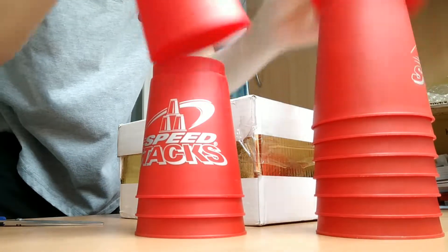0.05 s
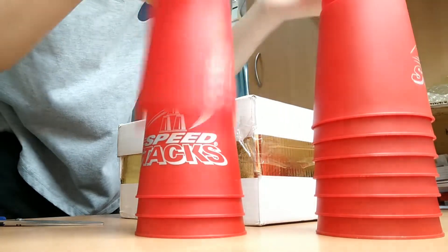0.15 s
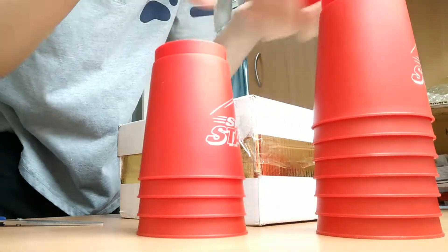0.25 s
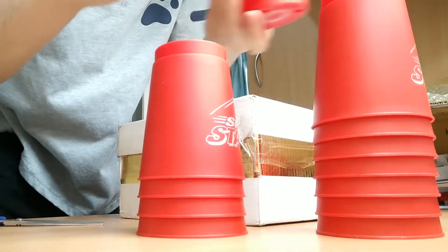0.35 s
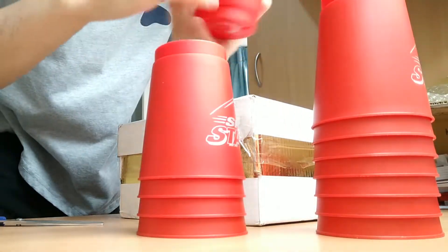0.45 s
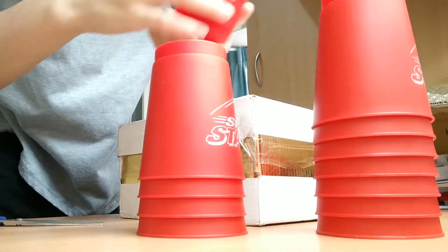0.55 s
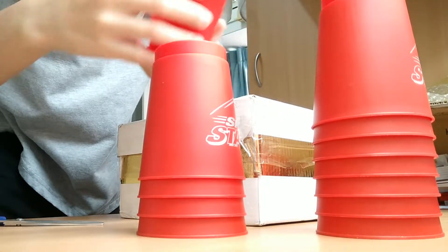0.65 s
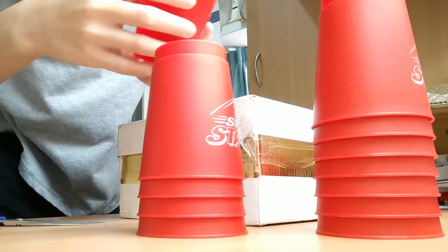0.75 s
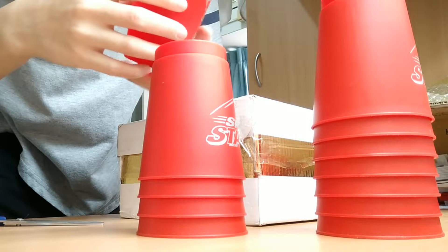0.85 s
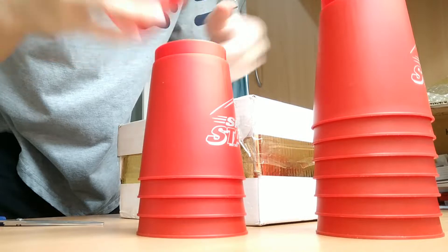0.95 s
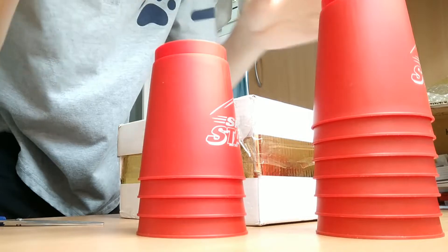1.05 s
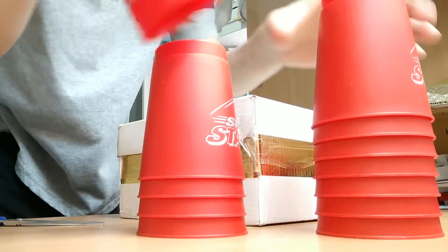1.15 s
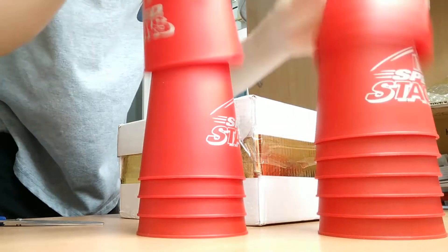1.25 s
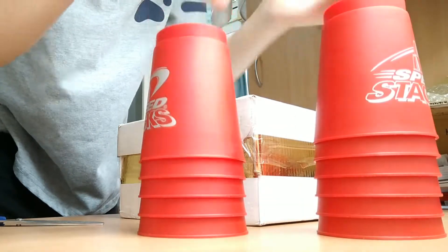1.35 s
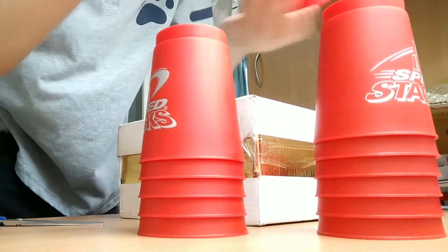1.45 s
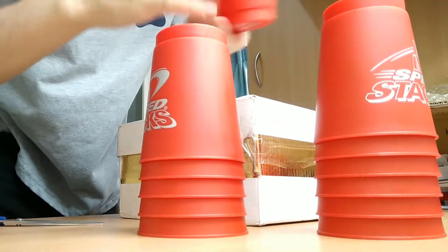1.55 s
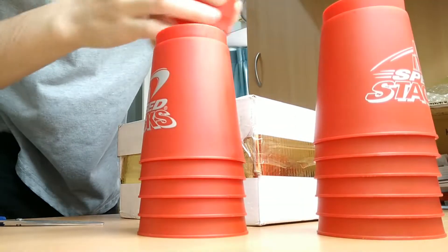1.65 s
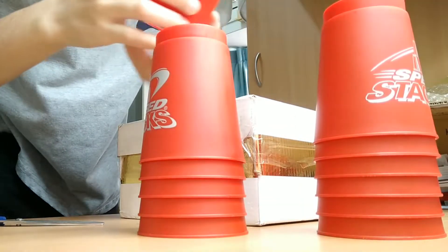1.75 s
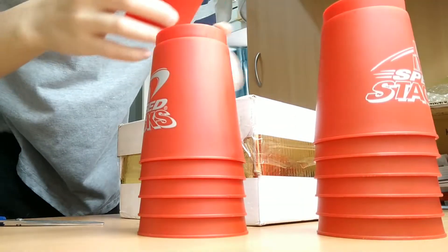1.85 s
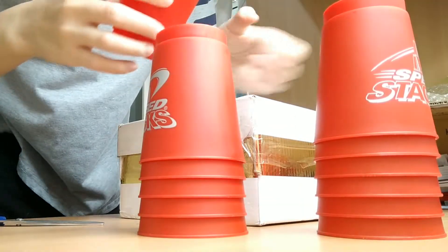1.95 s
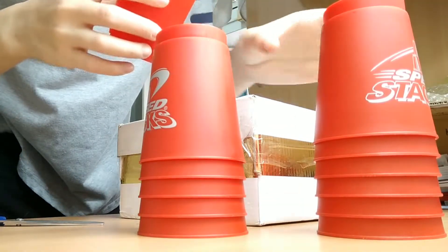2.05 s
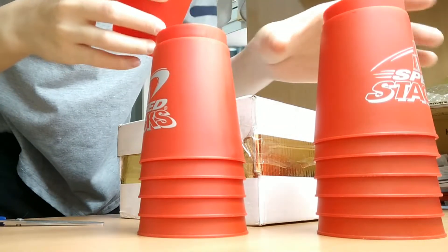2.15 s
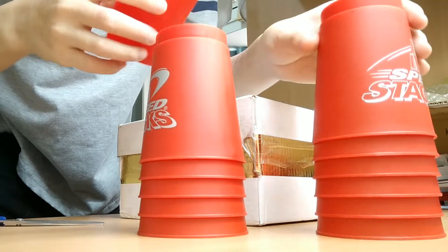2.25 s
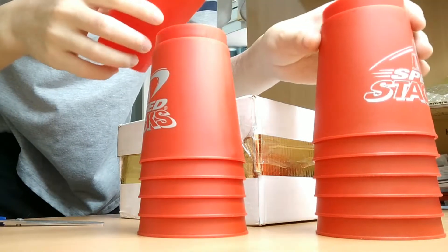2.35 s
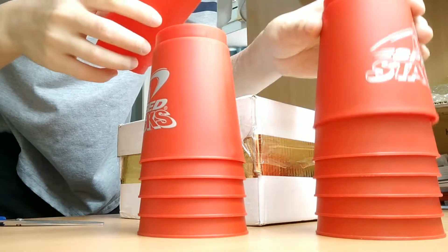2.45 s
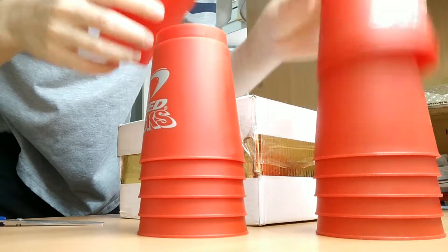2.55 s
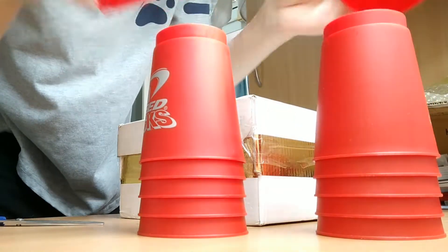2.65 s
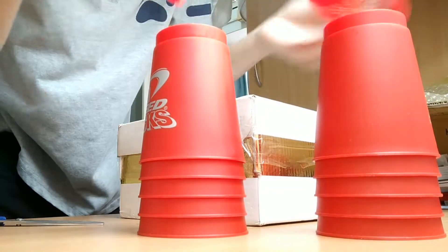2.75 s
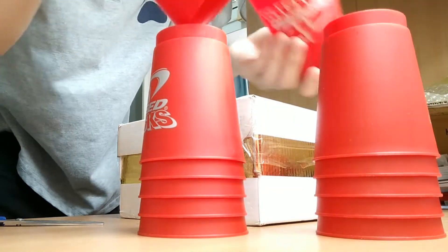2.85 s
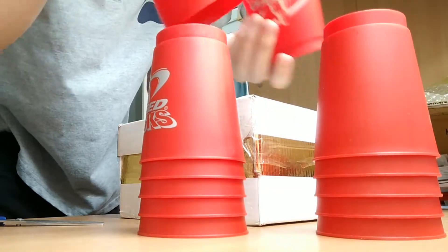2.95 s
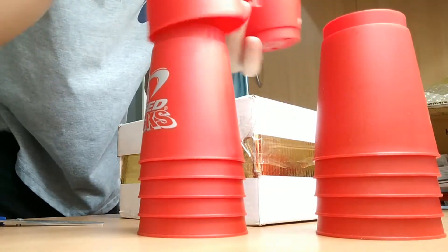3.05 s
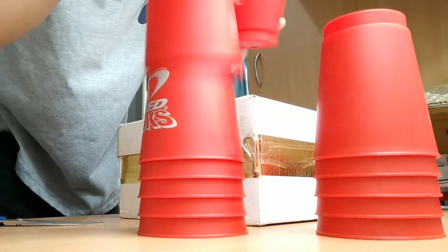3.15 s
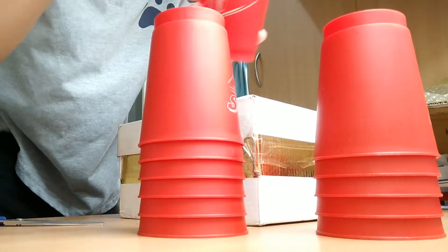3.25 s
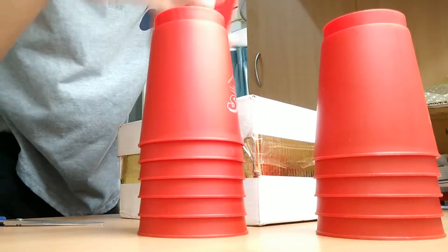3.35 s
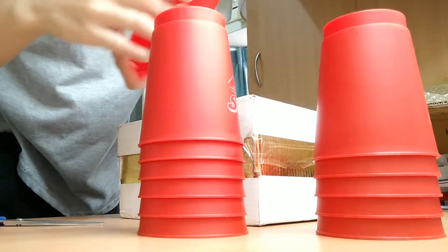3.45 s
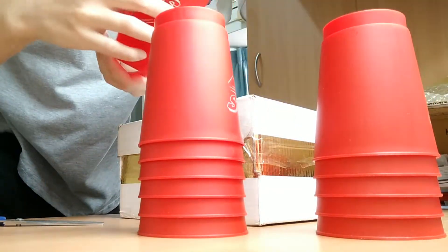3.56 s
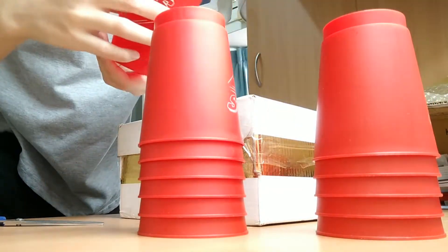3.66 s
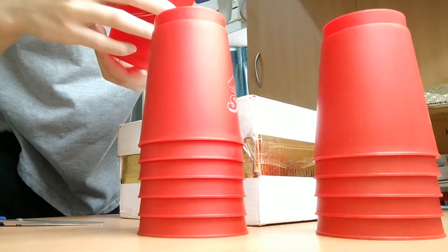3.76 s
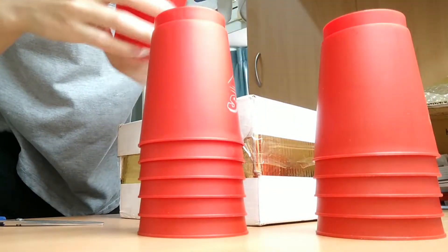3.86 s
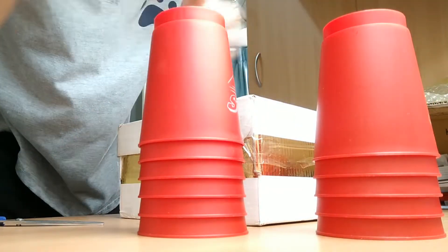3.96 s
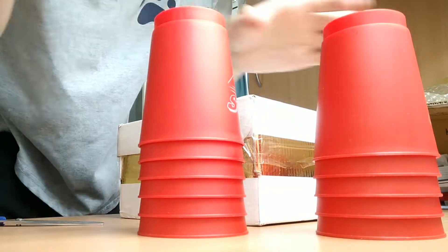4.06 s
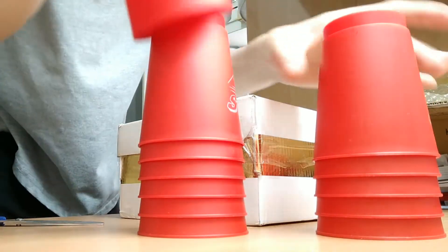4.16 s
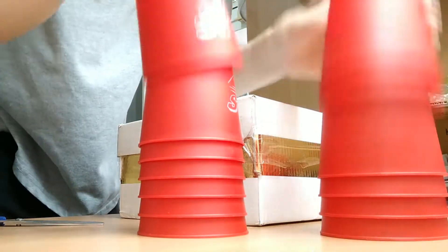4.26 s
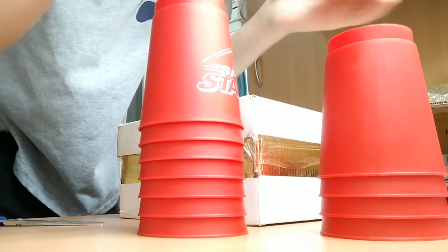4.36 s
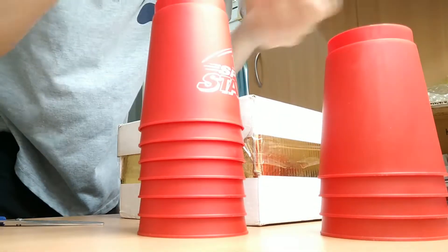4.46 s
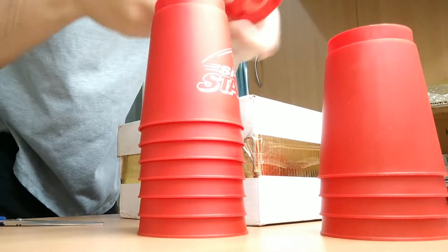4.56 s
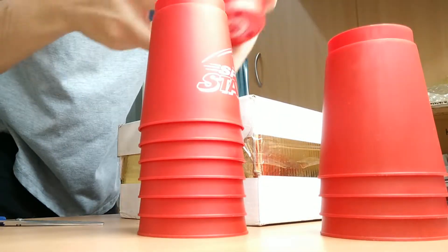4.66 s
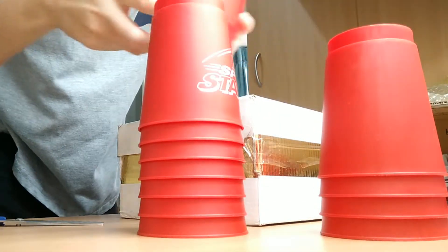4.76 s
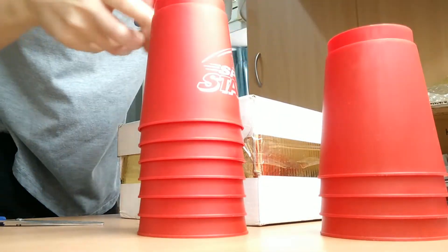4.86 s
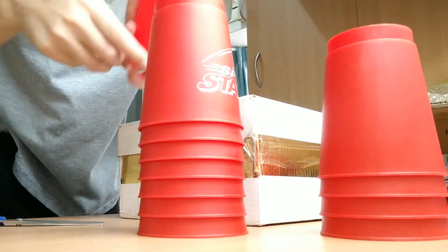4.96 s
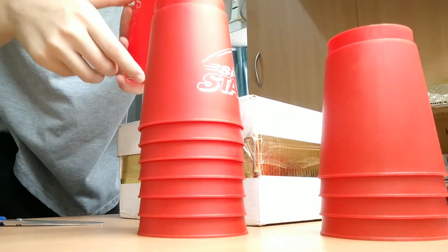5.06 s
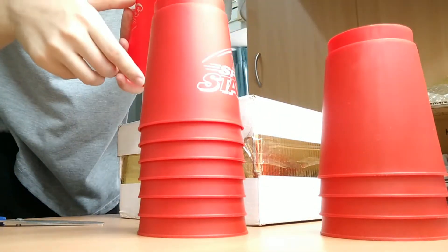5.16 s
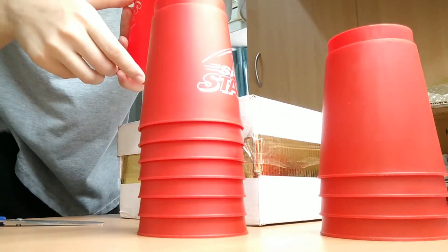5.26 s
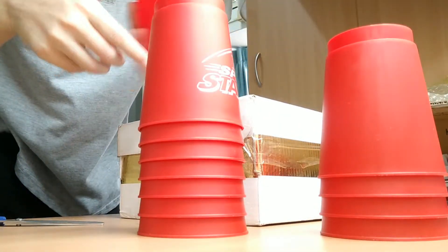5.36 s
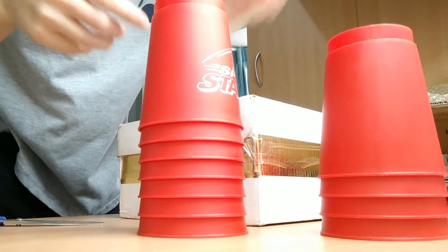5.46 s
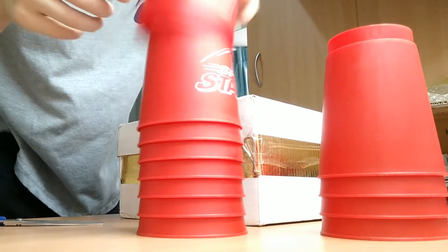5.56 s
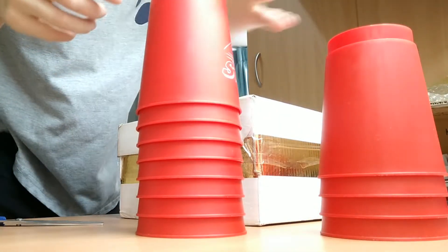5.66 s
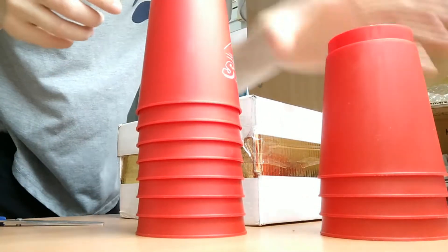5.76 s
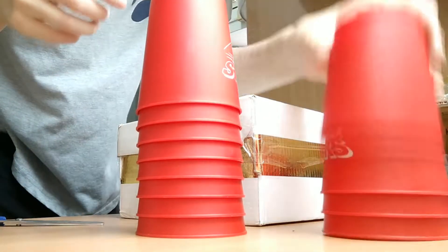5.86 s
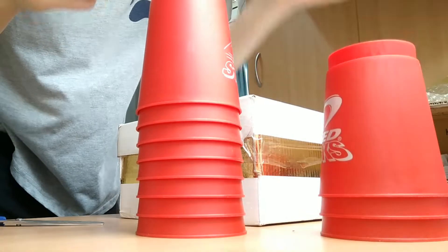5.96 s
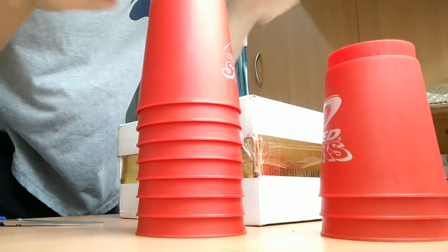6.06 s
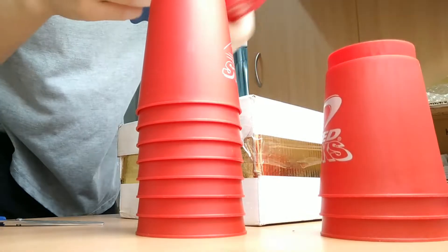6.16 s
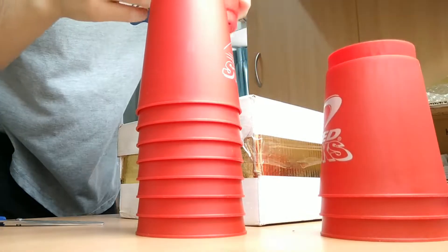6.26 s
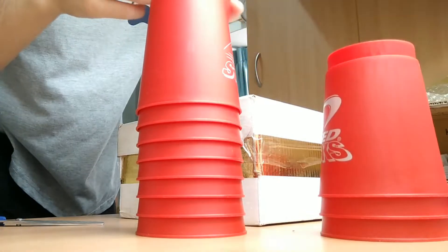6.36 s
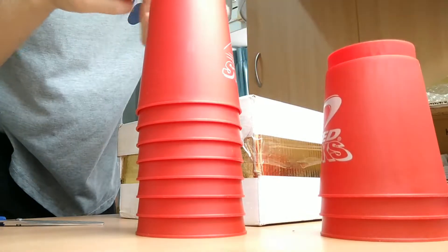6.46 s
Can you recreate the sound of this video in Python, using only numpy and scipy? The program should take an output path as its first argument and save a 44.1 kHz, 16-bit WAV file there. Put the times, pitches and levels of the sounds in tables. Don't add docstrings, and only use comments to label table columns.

```python
import sys
import numpy as np
from scipy import signal
from scipy.fft import rfft, irfft, next_fast_len
from scipy.io import wavfile
from scipy.ndimage import uniform_filter1d

SR = 44100
rng = np.random.default_rng(int(sys.argv[2]) if len(sys.argv) > 2 else 0)


def bounce(signal):
    frames = np.transpose(np.atleast_2d(signal))
    limited = np.clip(frames, -1, 1)
    pcm = np.round(limited * 32767).astype(np.int16)
    wavfile.write(sys.argv[1], SR, pcm)


def magnitude_from_level(level_db):
    exponent = np.asarray(level_db, float) / 20
    return 10 ** exponent


N = 287091

# start in seconds, peak in dB, cup pitch in Hz, rim click in dB against the peak.
STACK_KNOCKS = [(0.2803, -20.5, 1122, -5.5), (1.298, -49.5, 973.5, -29), (1.315, -31, 1009, -25.5),
                (1.361, -29.5, 1006, -8), (1.423, -25, 1026, -16), (2.384, -41, 1057, -14),
                (2.705, -35.5, 1220, 1), (3.242, -26.5, 1170, -11.5), (4.319, -50.5, 1335, -13.5),
                (4.3503, -19, 1104, -7.5), (4.4181, -20.5, 1002, -5.5), (4.424, -22, 1024, -0.5),
                (4.442, -17.5, 1000, -19.5), (5.703, -17.5, 1060, -28.5), (5.7331, -18, 1275, -4.5),
                (5.744, -16.5, 968, -14.5)]
# the same four, then trapped air in dB against the peak.
LANDINGS = [(1.37, -14.5, 1150, -6.5, -15), (1.4391, -9, 1190, -4.5, -9), (1.4601, -5.5, 1170, -10, -11),
            (2.934, -13.5, 1184, -13, -7.5), (3.302, -14.5, 1113, -6.5, -11),
            (3.326, -3.5, 1117, -13, -11.5), (4.377, -19.5, 1068, -5.5, -8),
            (4.387, -11.5, 1070, -6, -14.5), (4.459, -13.5, 1000, -18.5, -16.5),
            (5.6656, -9, 1094, -8.5, -13), (5.674, -4.5, 1119, -18, -31.5), (5.686, -12, 1181, -1.5, -26),
            (6.0022, -11, 1181, -31, -13.5), (6.007, -15, 1200, -42, -23.5), (6.013, -13, 1184, -30, -19.5)]
# factor on the cup pitch, level in dB, seconds to fade by 60 dB.
WALL = [(0.749, -9.5, 0.02), (.87, -6, 0.025), (1.002, 0.5, 0.03), (1.13, -6.5, 0.012), (1.29, -5, 0.022),
        (1.498, -3, 0.018), (1.75, -19, .014), (2.1, -13, .012)]


def stack_knocks():
    glancing = [(*row, -10.5 - 0.024 * (row[1] + 15)) for row in STACK_KNOCKS]
    return knocks(glancing + LANDINGS, 3160, WALL)


# start in seconds, peak in dB, cup pitch in Hz,
# rim click in dB against the peak, trapped air in dB against the peak.
LOOSE_KNOCKS = [(0.193, -11.5, 1449, -15, -10.5), (0.244, -44.5, 1447, -0.5, -26.5),
                (0.302, -13.5, 1479, -7.5, -11), (0.307, -27, 1510, -25, -24),
                (0.3195, -6.5, 1521, -21.5, -13), (0.859, -53, 1530, -6.5, -28.5),
                (2.943, -23.5, 1528, -4.5, -16), (2.952, -24.5, 1530, -4.5, -26),
                (3.012, -35, 1580, -4, -10), (3.064, -39, 1460, -9.5, -35), (3.126, -8.5, 1446, -38, -26),
                (3.168, -23.5, 1481, -12, -17), (3.2345, -30.5, 1760, -10, -32),
                (3.538, -66.5, 1530, 2, -23.5), (4.169, -66.5, 1640, -17.5, -28),
                (4.363, -20.5, 1573, -25.5, -9), (4.822, -42.5, 1215, -16, -39),
                (5.7545, -13.5, 1524, -17, -8.5), (5.954, -39.5, 1575, -7, -2),
                (5.974, -28.5, 1557, -13, -2), (6.034, -30.5, 1460, 3, 2.5)]
# factor on the cup pitch, level in dB, seconds to fade by 60 dB.
HELD_WALL = [(0.749, -10.5, 0.023), (0.871, -2, .018), (0.999, -0.6, 0.035), (1.131, -5, 0.029),
             (1.29, -11, 0.029), (1.5, -18, 0.014), (1.751, -15, 0.01), (2.1, -15, 0.0083)]


def loose_knocks():
    return knocks(LOOSE_KNOCKS, 2710, HELD_WALL)


# pitch in Hz, level in dB, seconds to fade by 60 dB.
CAVITY = [(375, -8.5, 0.017), (526, -1, 0.012), (543.2, -2, 0.051), (750, -6, 0.014), (869.2, -8.5, 0.0086)]


def knocks(rows, spot_hz, wall):
    out, t = np.zeros((2, N)), np.arange(SR // 12) / SR
    for (s, db, hz, click_db, cavity_db), luck in zip(rows, rng.standard_normal((len(rows), 6040))):
        rim_hz = spot_hz * np.exp(0.081 * luck[-1])
        contact_s = 0.0021 * (1.1 + max(-38.0 - db, 0) / 4.1)
        held = magnitude_from_level(60 * np.minimum(t, contact_s) / 0.043)
        swell = np.sin(np.pi / 2 * np.minimum(t / contact_s, 1)) ** 2 * held
        uneven = 1 + 0.3 * np.resize(evened(uniform_filter1d(luck[40:2040], 40)), len(t))
        wall_ring = ring(wall, luck, hz, spread_db=2, detune=0.015, size=len(t))
        air_ring = ring(CAVITY, luck[20:], detune=0.05, size=len(t))
        sound = peaked(swell * uneven * wall_ring, db)
        sound += peaked(swell * uneven * air_ring, db + cavity_db + 5.5)
        u = t[:2000] / (contact_s + 0.0016)
        puff = np.sin(np.pi / 2 * np.minimum(u * 3, 1)) ** 2 * np.exp(-u * 0.46)
        tilt_db = 1.6 * (click_db + 13.0)
        rims = [puff * rim(v, tilt_db, rim_hz) for v in luck[2040:].reshape(2, -1)]
        add(sound, 0, peaked(rims[0], db + click_db + 0.43))
        add(out[0], s - 0.0006, sound)
        add(out[1], s - 0.0006, peaked(rims[1], db + click_db - 2.5))
    return out


# frequency in Hz, level in dB per Hz.
CLICK = [(400, -49.5), (1500, -27), (2300, 8.5), (3250, 1), (4900, 0), (6900, -10.5), (7900, -17),
         (16000, -50.5)]


def rim(luck, tilt_db, peak_hz):
    hz = np.fft.rfftfreq(len(luck), 1 / SR)
    spot = 1 + magnitude_from_level(10.5) / (1 + ((hz - peak_hz) / 200) ** 2)
    colour_db = read(CLICK, hz) + tilt_db * np.log2(np.maximum(hz / 3000, 1))
    return irfft(rfft(luck) * spot * magnitude_from_level(colour_db))


# start in seconds, peak in dB, pitch of the low group in Hz, pitch of the high group in Hz.
TICKS = [(0.1938, -15.5, 3330, 5047), (0.2431, -32.5, 3150, 4756), (0.2801, -17.5, 3200, 4414),
         (0.3041, -16.5, 3100, 4386), (0.3174, -21.5, 2530, 5370), (1.3102, -47, 3090, 6350),
         (1.3375, -38.5, 3750, 6273), (1.3603, -23.5, 3930, 4296), (1.3686, -17.5, 3340, 4607),
         (1.4398, -8, 3400, 4127), (1.4587, -12.5, 2370, 6030), (2.7055, -25.5, 3770, 5360),
         (3.01, -25.5, 2386, 4100), (3.243, -28, 3300, 4973), (3.3006, -12.5, 3340, 4740),
         (3.3264, -15, 2675, 4933), (4.349, -20.5, 2800, 5100), (4.3764, -22, 2680, 4420),
         (4.3863, -10.5, 2570, 4426), (4.418, -23, 3160, 4590), (4.4232, -16, 3310, 4220),
         (4.4375, -24.5, 3900, 4000), (4.4602, -23, 2510, 4960), (5.6653, -12.5, 2750, 5390),
         (5.6747, -10, 3160, 5580), (5.6853, -19, 3370, 4952), (5.7218, -26, 3380, 5060),
         (5.733, -16.5, 3310, 4537), (5.7433, -21, 2700, 5130), (5.7537, -17.5, 2600, 5000),
         (5.9455, -46, 3700, 6390), (5.9544, -44, 3370, 4030), (5.9738, -31.5, 3630, 6160),
         (5.9915, -32.5, 2830, 4300), (6.0154, -23.5, 2310, 5170), (6.0344, -20.5, 3120, 4720)]
# factor on the group pitch, level in dB, seconds to fade by 60 dB.
TICK = [(.95, -3, 0.0075), (1.001, 2.5, 0.02), (1.06, -8, .012)]


def ticks():
    out, t = np.zeros((2, N)), np.arange(1500) / SR
    swell = np.sin(np.pi / 2 * np.minimum(t / 0.00092, 1)) ** 2
    for (s, db, low_hz, high_hz), luck in zip(TICKS, rng.standard_normal((len(TICKS), 24))):
        for row, part, less_db in zip(out, luck.reshape(2, -1), (-5.0, -11.0)):
            low = ring(TICK, part, low_hz, spread_db=2, detune=0.012, size=len(t))
            high = ring(TICK, part[6:], high_hz, spread_db=2, detune=0.012, size=len(t))
            add(row, s + 0.0006, peaked(swell * (low + magnitude_from_level(-3) * high), db + less_db))
    return out


# start in seconds, peak in dB, pitch in Hz, seconds to fade by 60 dB.
PINGS = [(0.193, -11, 1570, 0.015), (0.1975, -21, 1344, 0.014), (0.1972, -21, 3020, 0.013),
         (0.204, -23, 1490, .03), (0.21, -30, 3270, 0.016), (0.3023, -18.5, 2970, 0.025),
         (0.309, -20.5, 750, 0.02), (0.321, -12, 1484, 0.034), (0.3192, -18, 2350, 0.029),
         (0.3183, -17, 2730, .025), (0.328, -20.5, 2440, 0.021), (0.33, -22, 360, .06),
         (1.377, -25, 1514, 0.025), (1.4399, -12, 1196, 0.033), (1.4606, -7.5, 1166, .03),
         (1.4616, -17.5, 2410, 0.034), (2.401, -49.5, 1200, .05), (2.946, -24, 1487, 0.038),
         (3.01, -32.5, 2326, 0.032), (3.013, -33.5, 4540, 0.03), (3.1255, -12, 1507, .022),
         (3.167, -24.5, 1223, 0.037), (3.301, -18.5, 1090, 0.046), (3.3275, -16, 663, 0.048),
         (3.331, -20, 1870, 0.049), (4.364, -22.5, 1490, 0.028), (1.463, -18.5, 544, 0.064),
         (4.379, -15.5, 1068, .06), (4.388, -10.5, 1104, .03), (4.419, -22, 1000, 0.085),
         (4.437, -25, 1590, 0.074), (4.459, -16.5, 558, 0.026), (4.4603, -18.5, 1750, 0.026),
         (4.466, -20, 1000, 0.033), (4.8223, -44, 1145, 0.11), (4.838, -41.5, 1870, 0.046),
         (5.469, -66.5, 5280, 0.092), (5.6765, -9, 1120, 0.029), (5.674, -18, 5000, 0.022),
         (5.686, -7, 1178, 0.034), (5.686, -18, 3240, 0.029), (5.703, -21, 1130, 0.033),
         (5.7548, -15.5, 2610, 0.017), (5.7548, -20, 5000, 0.0058), (5.974, -32, 6240, 0.019),
         (6, -20.5, 1537, 0.039), (6.006, -9.5, 1200, 0.048), (6.029, -23.5, 1545, 0.034)]
# start in seconds, peak in dB, pitch in Hz.
SNAPS = [(0.1928, -12.5, 1800), (0.198, -14, 1680), (0.22, -35.5, 5300), (0.232, -37.5, 5000),
         (0.32, -9, 1650), (1.363, -27.5, 4160), (1.3705, -20, 4550), (1.396, -32, 4700),
         (1.4406, -16.5, 1490), (1.4614, -6.5, 1266), (1.72, -54, 3400), (1.83, -66.5, 2300),
         (3.2345, -32, 3000), (3.3268, -10, 1270), (4.3506, -21.5, 3200), (4.378, -21, 4370),
         (4.3896, -11.5, 1400), (4.4184, -23, 4740), (4.4387, -22.5, 4000), (4.4604, -14, 1296),
         (5.256, -63, 3300), (5.7225, -27.5, 4600), (5.7551, -10.5, 2800), (6.0339, -24.5, 4520)]


def pings():
    out, t = np.zeros(N), np.arange(SR // 5) / SR
    for s, db, hz, t60 in PINGS + [(*row, 8 / row[2]) for row in SNAPS]:
        swell = np.sin(np.pi / 2 * np.minimum(t / (0.07 * t60), 1)) ** 2
        add(out, s, peaked(-swell * magnitude_from_level(-60 * t / t60) * np.sin(2 * np.pi * hz * t), db))
    return out


# start in seconds, length in seconds, hiss in dB, rub of the cup body in dB.
DRAWS = [
    (0.031, 0.148, -37, -59.5),
    (1.304, 0.082, -46, -43.5),
    (2.498, .225, -38.5, -56.5),
    (4.323, .085, -34, -28),
    (5.941, .055, -45.5, -44),
]


def draws():
    out, top = [], 0.9
    for s, length, hiss_db, rub_db in DRAWS:
        u = np.arange(0, length, 1 / SR) / length
        swell_db = -40.5 * np.maximum(1 - u / top, 0) ** 1.8
        swell_db = swell_db - 26 * np.maximum(u - top, 0) / (1 - top)
        hz = 3654 + (5000 - 3654) * u ** 1.5
        out.append((s, slide(hiss_db + swell_db, hz, rub_db + swell_db, slow=(1 - u) ** 5.3)))
    return out


# start in seconds, length in seconds, hiss in dB, rub of the cup body in dB.
SETTLES = [
    (0.187, .075, -44.5, -29),
    (1.422, 0.018, -29.5, -26),
    (2.38, 0.07, -74.5, -48.5),
    (2.998, 0.1, -52.5, -43.5),
    (4.423, 0.049, -38.5, -27.5),
    (4.854, 0.065, -56, -45),
    (5.686, 0.033, -34.5, -30.5),
    (5.722, 0.02, -68.5, -36),
    (5.997, .05, -33, -33.5),
]


def settles():
    out = []
    for s, length, hiss_db, rub_db in SETTLES:
        u = np.arange(0, length, 1 / SR) / length
        out.append((s, slide(hiss_db - 22 * u, 4200, rub_db - 33.5 * u, lowest_db=-3.5)))
    return out


# start in seconds, length in seconds,
# hiss in dB, rub of the cup body in dB, base of the lowest resonance in Hz.
BRUSHES = [(0.212, 0.11, -57.5, -56, 3867), (1.371, 0.052, -35.5, -41, 3305),
           (1.695, 0.045, -68, -92.5, 4170), (2.938, 0.033, -50.5, -38.5, 4240),
           (4.154, 0.043, -73, -91, 4330), (4.358, 0.077, -42, -49.5, 4470),
           (4.648, 0.085, -68, -89.5, 4100), (4.824, 0.048, -59.5, -44, 3495),
           (3.139, 0.23, -73.5, -68, 3926), (4.436, 0.027, -59, -27.5, 4285),
           (0.852, 0.024, -71.5, -74, 3300), (5.99, 0.051, -36, -51.5, 3257),
           (6.329, 0.027, -68, -80, 3500)]


def brushes():
    out = []
    for s, length, hiss_db, rub_db, hz in BRUSHES:
        u = np.arange(0, length, 1 / SR) / length
        arch_db = -9 * (2 * u - 1) ** 2
        out.append((s, slide(hiss_db + arch_db, hz * (1.4 + 0.12 * u), rub_db - 7 * u, lowest_db=-2)))
    return out


# factor on the lowest resonance, width in Hz, level in dB, need of speed (a plain number).
HISS = [(1.002, 360.4, 1, 0), (1.38, 350.7, -7.5, 1), (1.53, 450.4, -6, 0.4), (1.85, 1000, -8.5, 3.5)]
# frequency in Hz, width in Hz, level in dB.
RUB = [(1000, 34, 4.5), (1200, 30, 3.5), (1660, 170, 5.5), (2000, 84, -8), (2700, 410, -3)]


def slide(hiss_db, hz, rub_db, slow=0, lowest_db=0):
    grit = rng.standard_normal((4, len(hiss_db)))
    drives = grit[:2] * magnitude_from_level(3.3 * evened(uniform_filter1d(grit[2], 50)))
    f0, w0, db0, _ = HISS[0]
    mid, dull_db = np.mean(hz), -25.5 * slow
    upper = mid * (hz / mid) ** 0.3
    walls, airs = [], []
    for drive in drives:
        wall = magnitude_from_level(db0 + lowest_db) * patchy(steep(drive, hz * f0, w0))
        wall = wall + magnitude_from_level(-8.5 + dull_db / 2) * patchy(steep(drive[::-1], 3050, 450))
        for f, w, db, need in HISS[1:]:
            shifted = np.roll(drive, int(f * 100))
            wall = wall + magnitude_from_level(db + need * dull_db) * patchy(steep(shifted, upper * f, w))
        walls.append(evened(wall))
        air = patchy(steep(drive, 10300 * upper / mid, 790))
        airs.append(evened(air + magnitude_from_level(-8.0) * steep(drive[::-1], 13800, 1800)))
    walls = signal.sosfilt(signal.butter(6, 2500, "high", fs=SR, output="sos"), np.array(walls))
    airs = np.array(airs) * magnitude_from_level(-61 * slow)
    both = magnitude_from_level(hiss_db) * (walls + magnitude_from_level(-12) * airs) * magnitude_from_level([[0], [-5.5]])
    body = sum(magnitude_from_level(db) * patchy(steep(grit[3], f, w)) for f, w, db in RUB)
    both[0] += magnitude_from_level(rub_db) * evened(body)
    return both * signal.windows.tukey(len(hiss_db), 0.15)


# start in seconds, peak in dB, pitch in Hz.
JOLTS = [(0.022, -37.5, 210), (0.199, -22.5, 207), (0.305, -18.5, 214.5), (1.188, -45, 180),
         (1.328, -25, 221.5), (1.376, -20, 207.2), (1.462, -15, 203.1), (1.575, -41, 188.8),
         (2.38, -32.5, 205), (2.934, -17.5, 177.2), (3.136, -28.5, 208.7), (3.171, -25, 205.6),
         (3.227, -41, 197), (3.303, -21, 188.3), (3.332, -15.5, 211.8), (3.408, -41, 166.8),
         (3.506, -38.5, 195.7), (4.341, -27, 208.3), (4.362, -18, 220.2), (4.43, -19, 180),
         (4.456, -20.5, 207), (4.527, -40, 177.6), (5.008, -50, 208.5), (5.671, -15.5, 190.3),
         (5.703, -18, 196.4), (5.753, -16, 211), (5.825, -33.5, 191), (5.957, -30.5, 197.2),
         (6.007, -18.5, 216), (6.428, -46.5, 205)]
# pitch in Hz, level in dB, seconds to fade by 60 dB.
SWAY = [(62, -2.5, 0.1), (95, 3, 0.16), (126, 2, 0.25)]


def table():
    out, push = np.zeros(N), signal.windows.hann(SR // 110)
    top_modes = [(1.001, 5.0, 0.18), (0.99, -10.5, 0.061), (1.4, -7.0, 0.13), (0.93, -2.5, 0.17)]
    for (s, db, hz), luck in zip(JOLTS, rng.standard_normal((len(JOLTS), 20))):
        top = ring(top_modes, luck, hz, detune=0.025)
        tuned_push = push * np.cos(np.arange(len(push)) / SR * 2 * np.pi * hz)
        add(out, s - 0.003, peaked(signal.fftconvolve(tuned_push, top), db))
        legs = signal.fftconvolve(push, ring(SWAY, luck[10:], detune=0.26))
        add(out, s, peaked(legs, db - 7.5 - 0.38 * (db + 27.0)))
    return signal.sosfilt(signal.butter(6, 56, "high", fs=SR, output="sos"), out)


# start in seconds, peak in dB, upper tones in dB against it, favoured tone in Hz.
CREAKS = [(0.571, -87, 9, 6350), (1.1904, -79, 1, 6350), (1.2557, -69, -14.5, 6350),
          (1.283, -65.5, -9, 6760), (1.6318, -71, -10.5, 6350), (1.7024, -77, 14.5, 3400),
          (2.519, -76.5, -13.5, 3400), (2.875, -68.5, -6.5, 6350), (3.4306, -55.5, -15.5, 5250),
          (3.5007, -68.5, -8, 3400), (3.5594, -70, -22.5, 3400), (3.926, -70, -17.5, 6350),
          (4.0998, -67, -8.5, 6350), (4.1426, -62.5, -8, 6350), (4.312, -73, 0.5, 6350),
          (4.581, -67, -7, 6350), (4.663, -73.5, 13.5, 3530), (4.705, -62, -16, 6350),
          (4.753, -63, -13, 5250), (4.782, -71, -6, 5250), (4.918, -66, -11, 5250), (5.036, -70, -8, 5250),
          (5.1064, -61.5, -11.5, 3400), (5.1583, -71, -8, 3400), (5.231, -57, -13.5, 3400),
          (5.328, -74.5, -14, 5250), (5.455, -60, -20, 5250), (5.6503, -61, -20, 3400),
          (6.333, -57, 1, 3400), (6.4736, -62, -19, 3400)]
# frequency in Hz, width in Hz, level in dB.
CREAK = [(1530, 130, -0.5), (3400, 220, -8.5), (5250, 90, -8), (6350, 520, -1.5), (7800, 320, -1),
         (10380, 1500, -7.5)]


def creaks():
    low, upper, u = np.zeros(N), np.zeros(N), np.arange(SR // 8) / SR
    puff = np.minimum(u / 0.00071, 1) * np.exp(-u / 0.032)
    for (s, db, upper_db, grip_hz), luck in zip(CREAKS, rng.standard_normal((len(CREAKS), len(u) + 10))):
        bands = [magnitude_from_level(b) * evened(steep(luck[10:], hz * (1 + 0.005 * y), w))
                 for (hz, w, b), y in zip(CREAK, luck)]
        add(low, s, magnitude_from_level(db - 2.5) * puff * patchy(bands[0]))
        favoured = sum(magnitude_from_level(-23 * abs(np.log2(hz / grip_hz))) * band
                       for (hz, _, _), band in zip(CREAK[1:], bands[1:]))
        add(upper, s, magnitude_from_level(db + upper_db) * puff * favoured)
    return low * magnitude_from_level([[-9], [3]]) + upper * magnitude_from_level([[1.5], [-3]])


# frequency in Hz, level in dB per Hz.
HUM = [(15, -55), (25, -23.5), (45, -25), (72, -1.5), (140, -14.5), (195, -4.5), (330, -28.5), (560, -24.5),
       (1500, -37.5), (3300, -42.5), (5000, -44), (9000, -57), (13000, -50), (16000, -69)]
# frequency in Hz, width in Hz, level in dB.
HUM_MODES = [(91.7, 12, 2), (180, 3.5, -5), (207, 140, -12.5)]


def hum():
    frames, hz = N // 512 + 5, np.fft.rfftfreq(2048, 1 / SR)
    patches = rng.standard_normal((1025, frames))
    patches = evened(uniform_filter1d(uniform_filter1d(patches, 8, 0), 6, 1))
    bumps = 1 + sum(magnitude_from_level(db + 7.0) / (1 + (2 * (hz - f) / w) ** 2) for f, w, db in HUM_MODES)
    z = noise_pair(hz, frames) * bumps[:, None] * magnitude_from_level(read(HUM, hz)[:, None] + 1.1 * patches)
    return magnitude_from_level(-63.5) * evened(signal.istft(z, nperseg=2048, noverlap=1536)[1][:, :N])


# frequency in Hz, likeness (1 is identical).
SAME = [(60, 0.94), (180, 1), (550, 0.46), (1650, 0.033), (4970, 0.087), (15000, 0.01)]


def noise_pair(hz, frames):
    a, b, c, d = rng.standard_normal((4, len(hz), frames))
    same, left = np.clip(read(SAME, hz), -1, 1)[:, None], a + 1j * b
    return np.array([left, same * left + np.sqrt(1 - same ** 2) * (c + 1j * d)])


# frequency in Hz, seconds to fade by 60 dB.
ROOM = [(100, 0.4), (250, 0.25), (600, 0.04), (1500, 0.24), (3500, 0.2), (6200, 0.165), (9000, 0.12),
        (14000, 0.14)]
# frequency in Hz, level in dB.
WET = [(200, -4.5), (600, -3.5), (1500, -19), (4000, -15.5), (8000, -17), (14000, -17)]


def room(x):
    hz, t, z = signal.stft(x, SR, nperseg=256)
    keep = magnitude_from_level(-120 * t[1] / read(ROOM, hz))
    power = np.array([signal.lfilter([1 - k], [1, -k], abs(row) ** 2) for k, row in zip(keep, z)])
    gaps = rng.standard_normal((len(hz), len(t)))
    gaps = evened(uniform_filter1d(uniform_filter1d(gaps, 3, 0), 4, 1))
    power = abs(uniform_filter1d(power, 3, 0)) * magnitude_from_level(4.5 * gaps - 1)
    echo = noise_pair(hz, len(t)) * np.sqrt(power) * magnitude_from_level(read(WET, hz))[:, None]
    tail = signal.istft(echo, SR, nperseg=256)[1]
    return np.pad(tail, ((0, 0), (250, 0)))[:, :N]


# frequency in Hz, left minus right in dB.
LEAN = [(60, 1.5), (150, .7), (350, 2.2), (700, -1), (1400, -1), (2800, 5), (5500, 9), (8500, 0),
        (15000, -1)]
# frequency in Hz, lead in radians.
LEAD = [(0, 0), (200, .15), (330, .9), (600, .5), (1030, .8), (1550, 1.6), (16000, 1.6)]


def ports(x):
    size = next_fast_len(N + 4096)
    hz = np.fft.rfftfreq(size, 1 / SR)
    half = magnitude_from_level(read(LEAN, hz) / 2) * np.exp(0.5j * np.interp(hz, *np.transpose(LEAD)))
    return irfft(rfft(x, size) * np.array([half, 1 / half]), size)[:, :N]


# frequency in Hz, level in dB.
MIC = [(9000, -2.5), (11300, -3.5), (12100, -9), (15300, -12), (16200, -44.5)]


def microphone(x):
    size = next_fast_len(N)
    return irfft(rfft(x, size) * magnitude_from_level(read(MIC, np.fft.rfftfreq(size, 1 / SR))), size)[:, :N]


def ring(modes, luck, scale=1.0, spread_db=4, detune=0.027, size=SR // 4):
    t = np.arange(size) / SR
    return sum(magnitude_from_level(db + spread_db * a - 60 * t / t60) * np.sin(2 * np.pi * hz * scale * (1 + detune * b) * t)
               for (hz, db, t60), a, b in zip(modes, luck[::2], luck[1::2]))


def resonate(x, hz, width):
    turn = np.exp(2j * np.pi * np.cumsum(hz * np.ones(len(x))) / SR)
    r = np.exp(-np.pi * width / SR)
    return 2 * (turn * signal.lfilter([1 - r], [1, -r], x / turn + 1e-18)).real


def steep(x, hz, width):
    return resonate(resonate(x, hz, width), hz, 2 * width)


def patchy(x):
    grip = uniform_filter1d(rng.standard_normal(len(x)), int(0.012 * SR))
    return x * magnitude_from_level(4.2 * evened(uniform_filter1d(grip, 100)))


def evened(x):
    return x / np.sqrt(np.mean(x ** 2) + 1e-20)


def peaked(x, db):
    return magnitude_from_level(db) * x / (abs(x).max() + 1e-12)


def read(points, hz):
    f, value = np.transpose(points)
    return np.interp(np.log(hz + 1), np.log(f + 1), value)


def add(mix, s, sound):
    part = mix[max(round(s * SR), 0):][:len(sound)]
    part += sound[:len(part)]


def scene():
    cups, stray = stack_knocks() + loose_knocks() + ticks()
    cups = cups + pings()
    for s, (direct, other) in draws() + settles() + brushes():
        add(cups, s, direct)
        add(stray, s, other)
    near = ports(cups + table()) + ports(stray) * [[1], [-1]] + room(cups + stray)
    return microphone(near) + creaks() + hum()


def roll_off(x):
    return signal.sosfilt(signal.butter(12, 16430, fs=SR, output="sos"), x)


def record(dry):
    mix = 1.457 * np.tanh(dry / 1.145)
    return roll_off(mix)


dry = scene()
out = record(dry)
bounce(out)
```